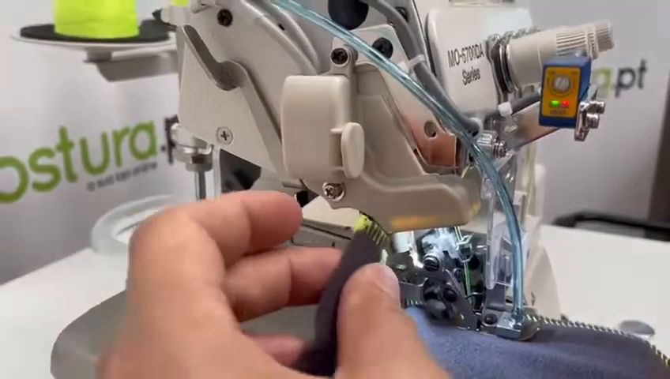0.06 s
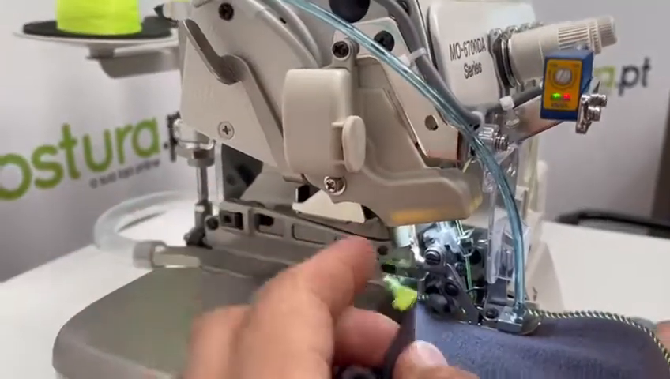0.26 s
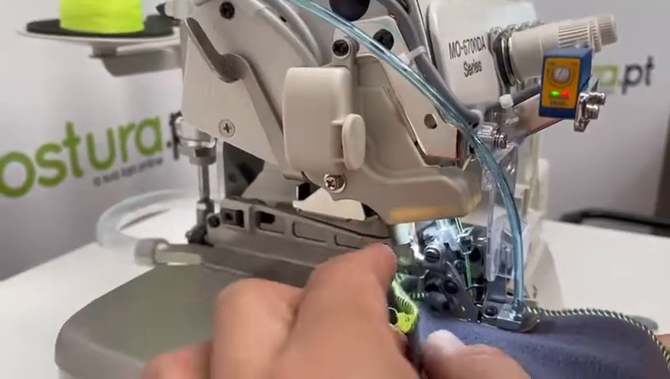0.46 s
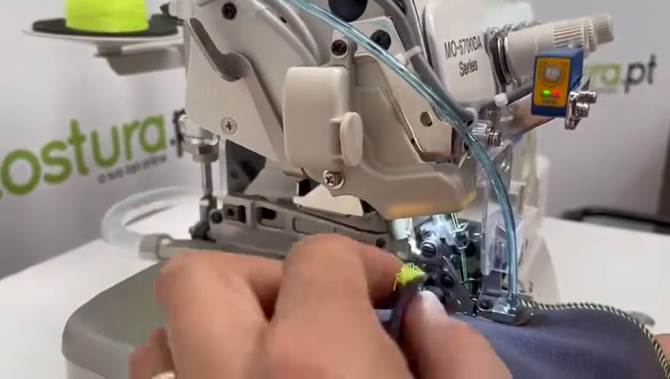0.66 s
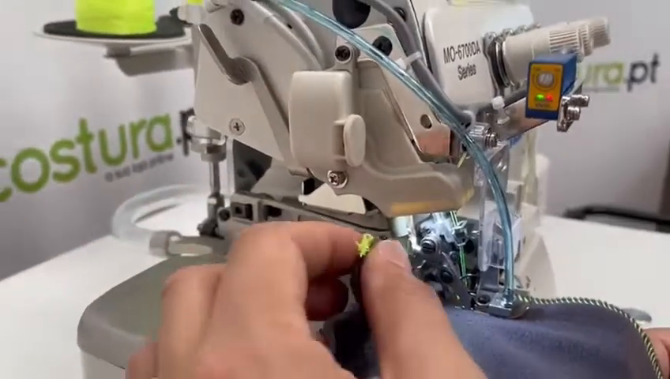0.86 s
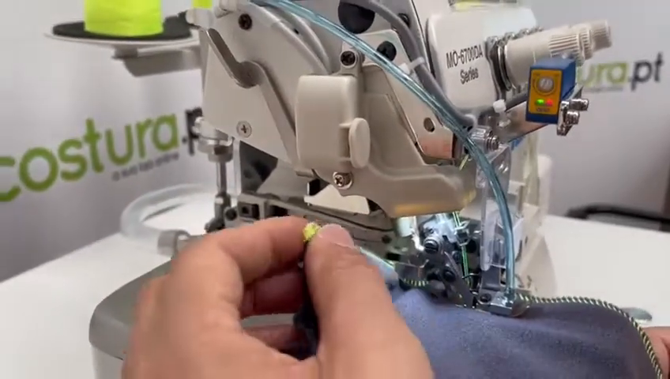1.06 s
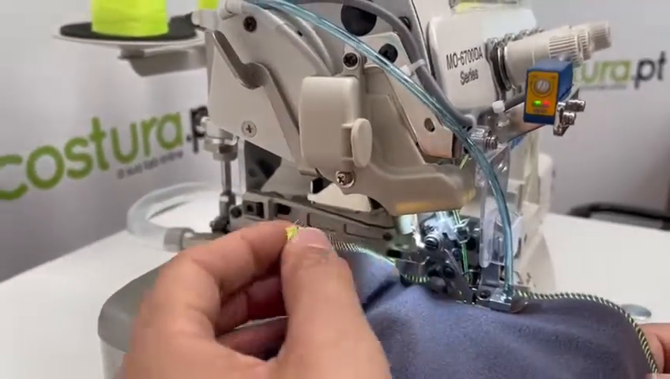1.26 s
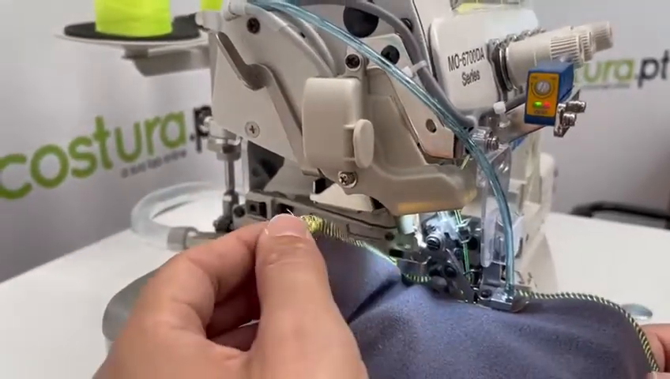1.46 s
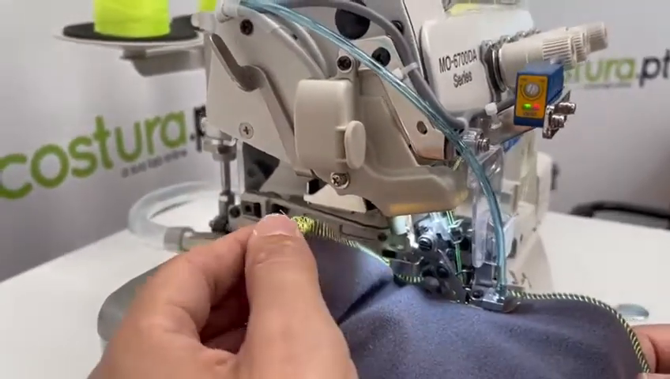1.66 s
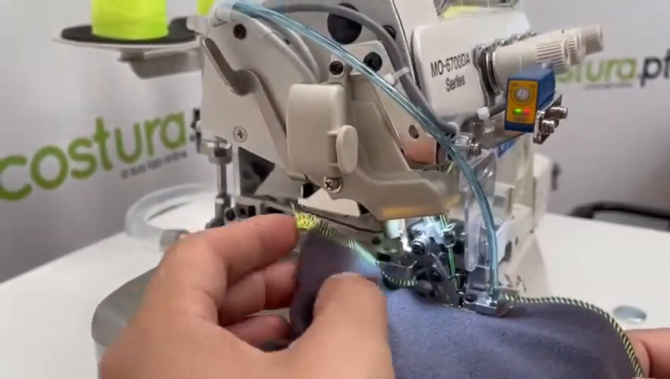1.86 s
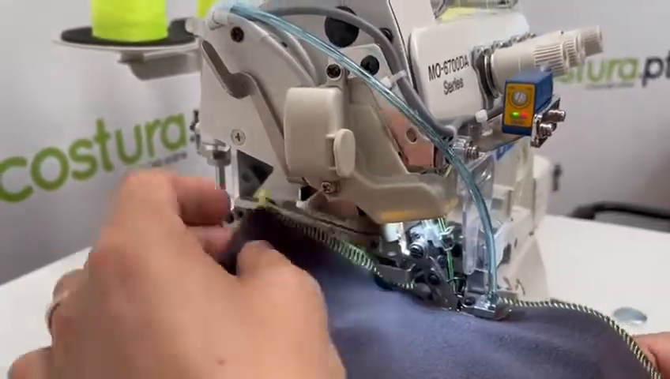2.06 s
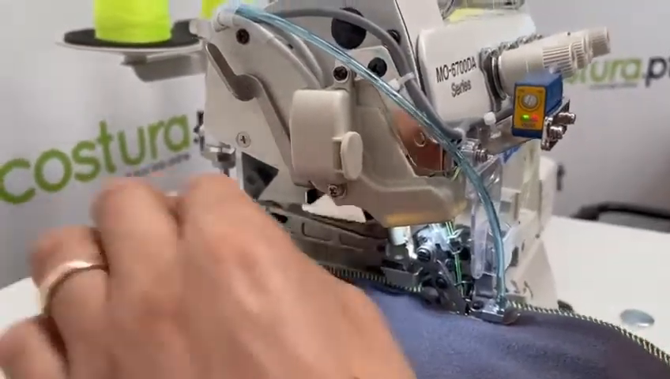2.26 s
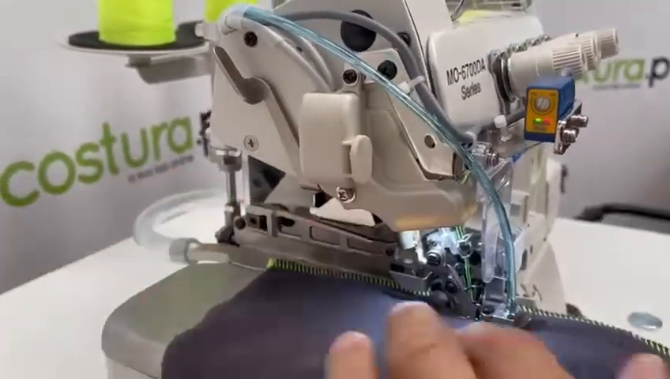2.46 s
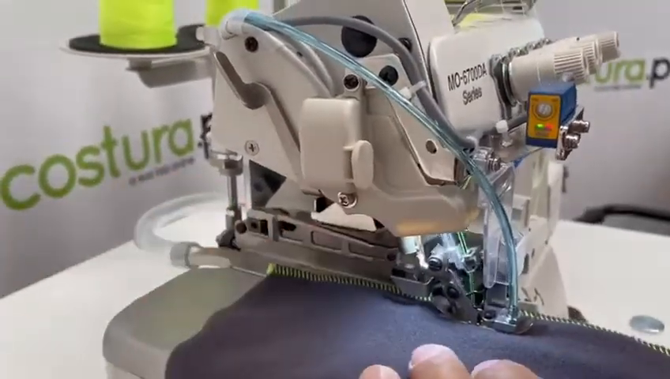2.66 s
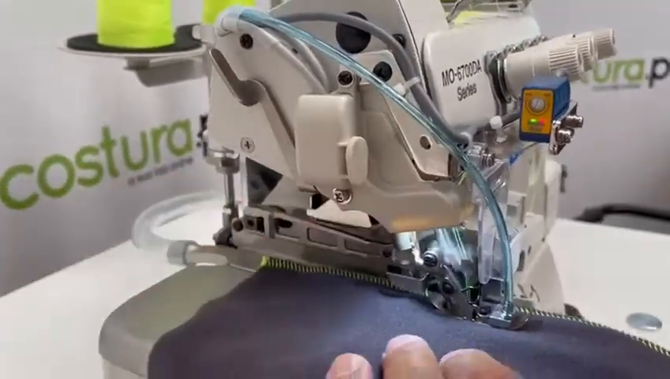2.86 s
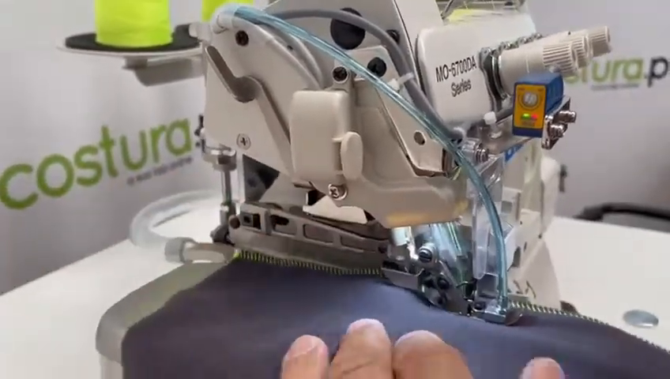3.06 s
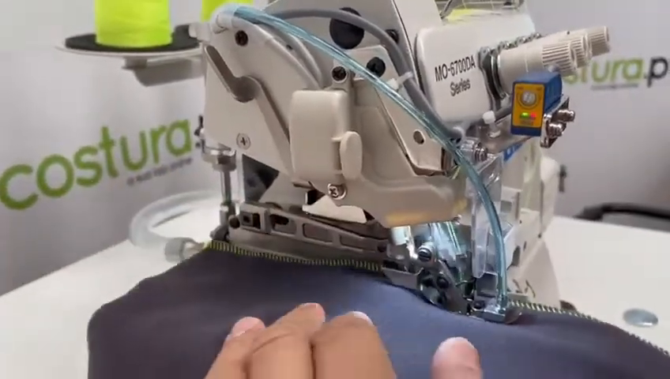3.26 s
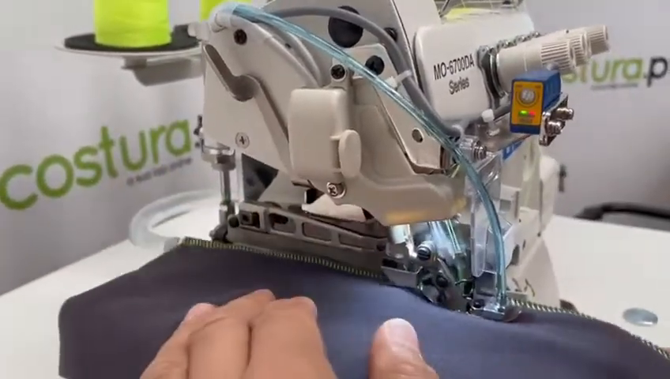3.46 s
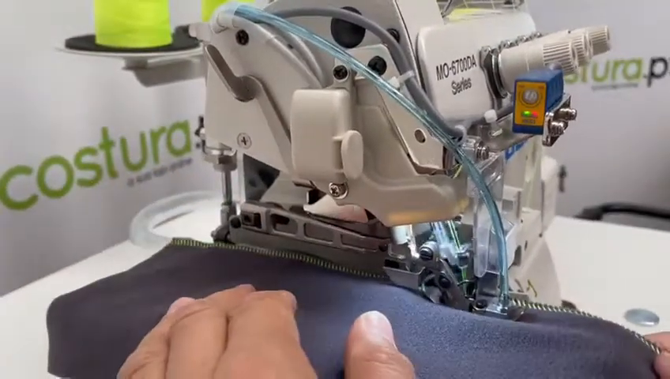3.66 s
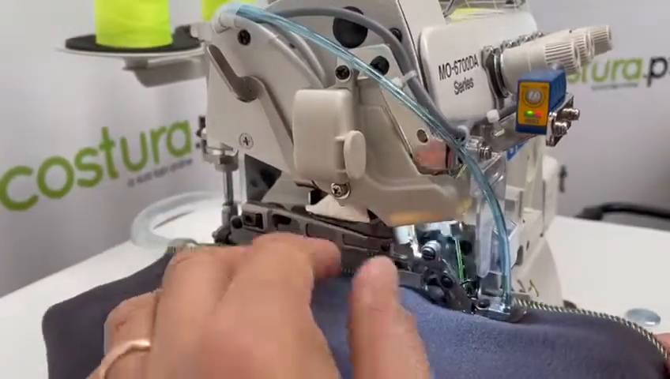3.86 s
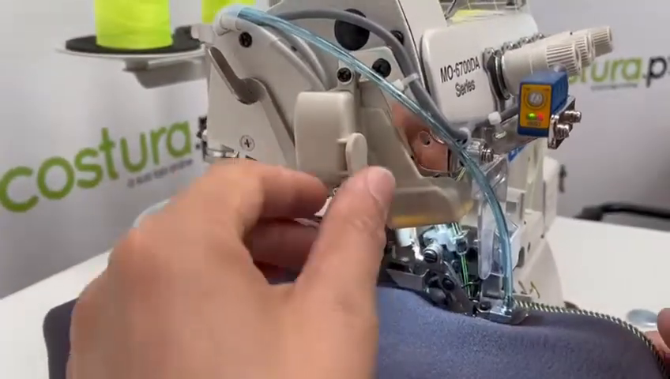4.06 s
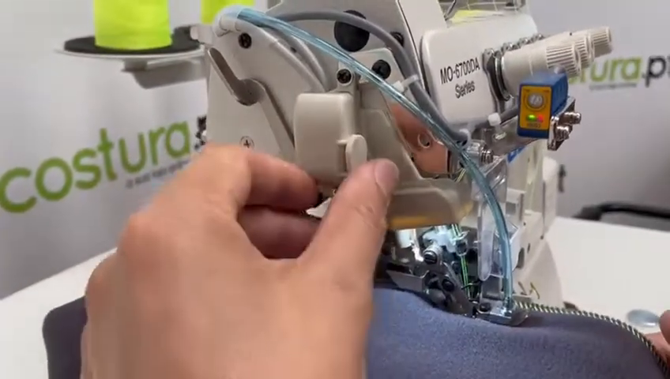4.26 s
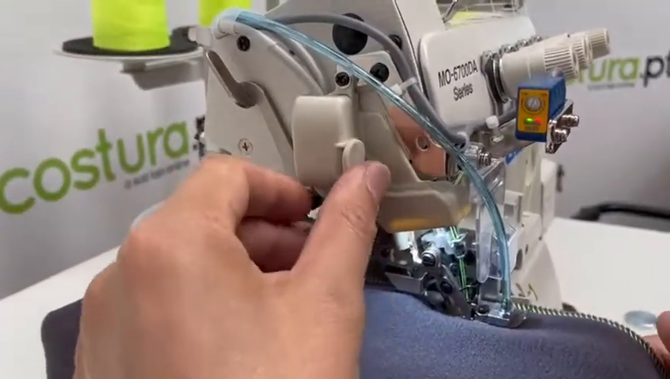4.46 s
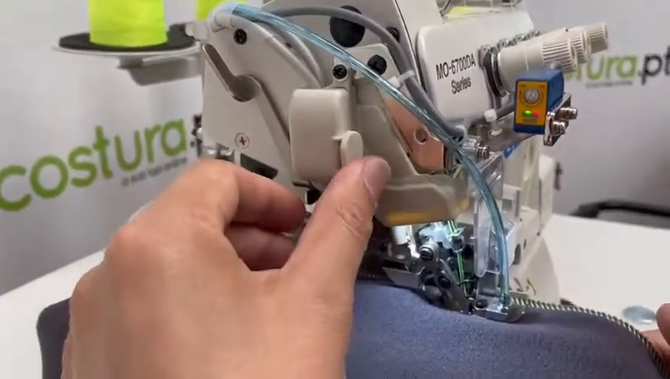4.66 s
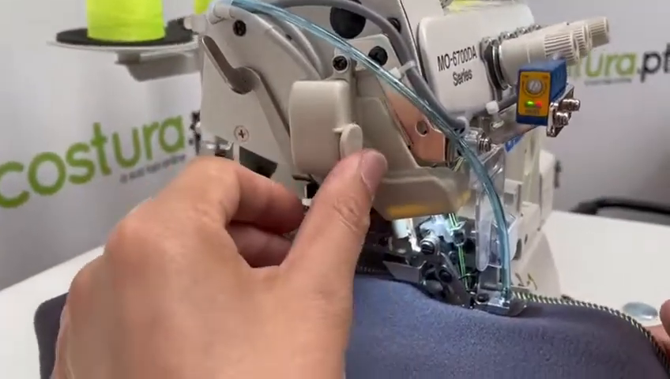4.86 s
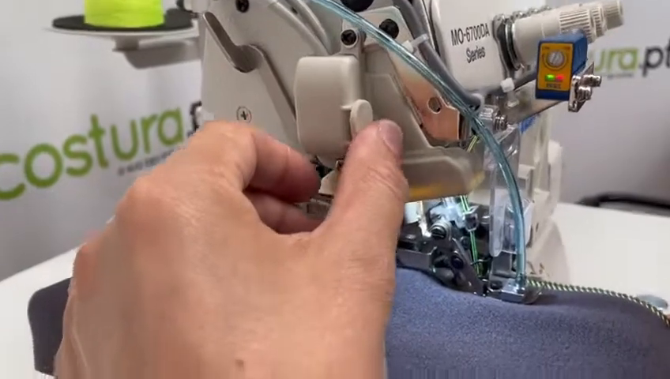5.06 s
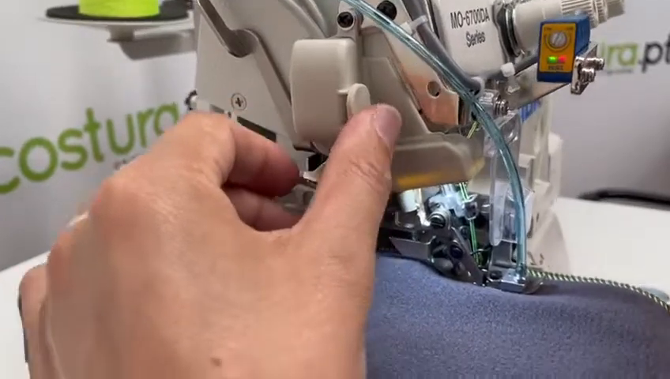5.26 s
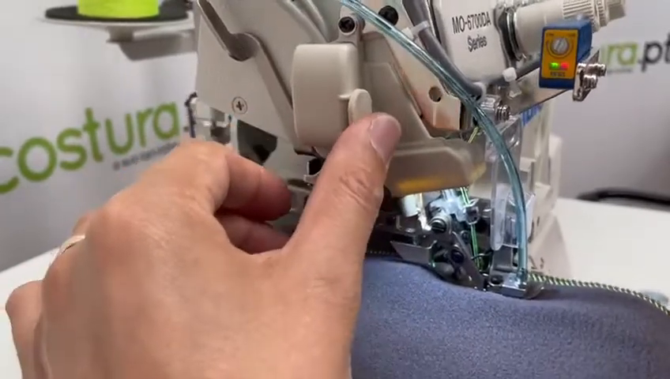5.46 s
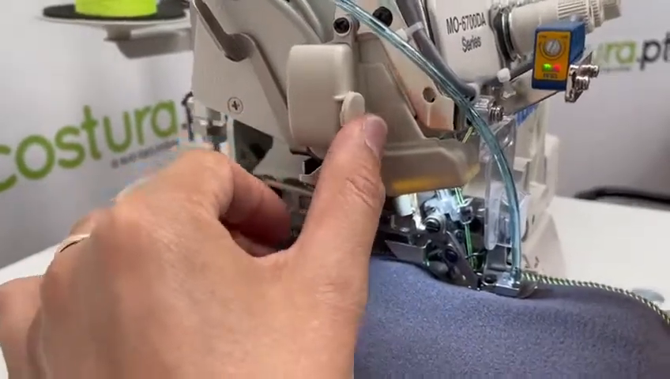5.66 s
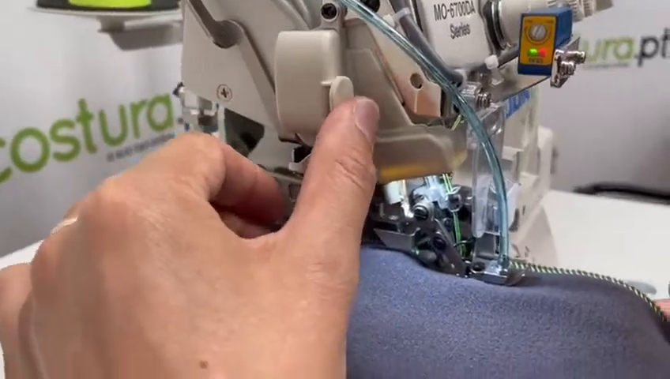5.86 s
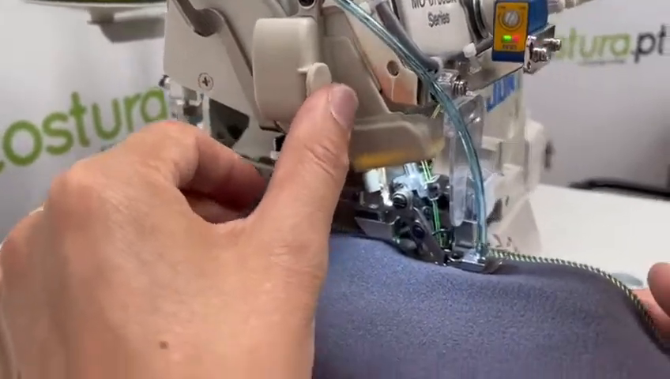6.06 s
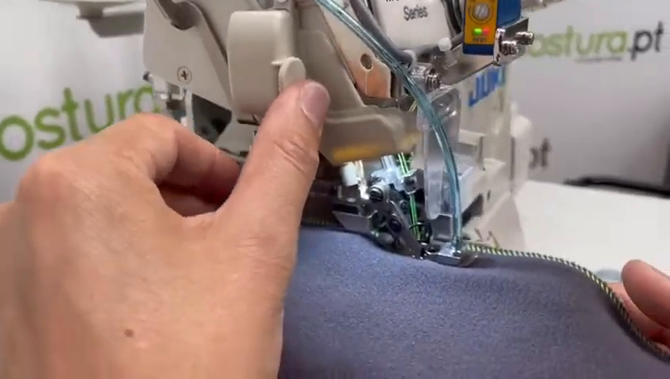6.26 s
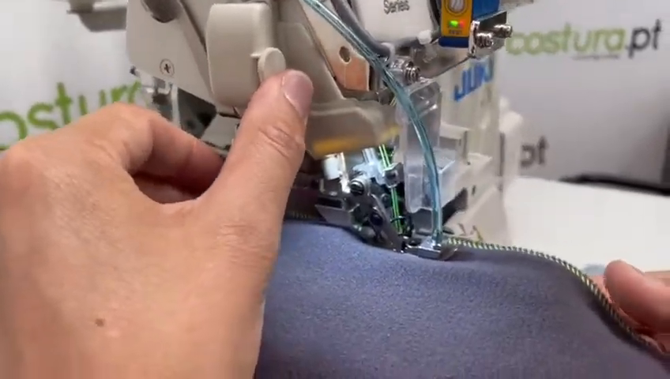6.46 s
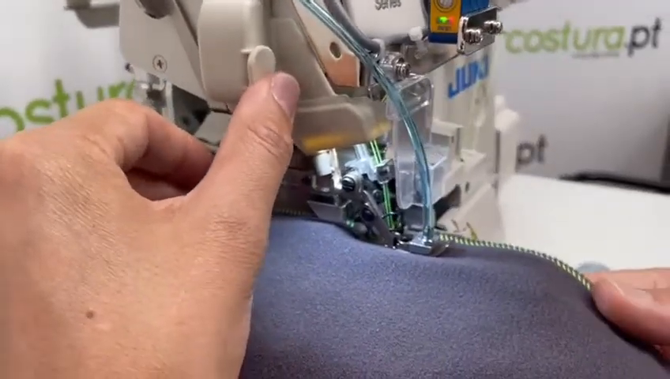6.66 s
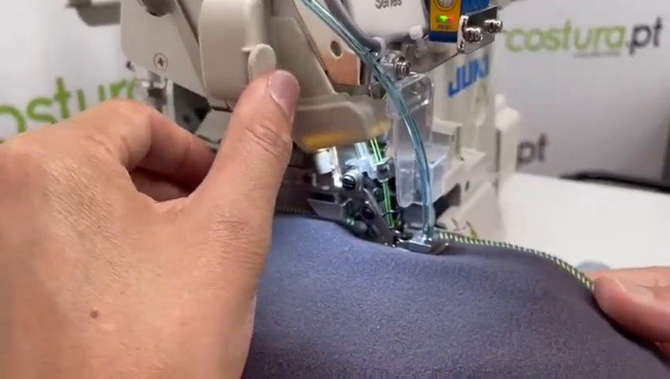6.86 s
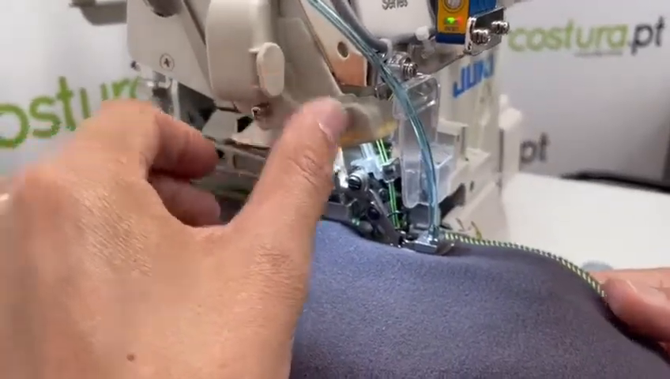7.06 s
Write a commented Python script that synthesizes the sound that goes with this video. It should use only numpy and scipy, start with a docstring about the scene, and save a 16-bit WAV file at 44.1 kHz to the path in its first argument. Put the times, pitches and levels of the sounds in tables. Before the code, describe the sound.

A low, quiet workshop rumble runs throughout. For the first two and a half seconds, hands faintly swish fabric over a work plate, with a soft bump near 2 seconds. At 2.7 seconds, close to the stereo microphone, an air valve snaps open, the presser foot knocks down and a loud, bright suction hiss begins, echoing slightly in the room. From about 2.9 seconds an industrial sewing machine whirrs and rattles through one fast seam, shaking its table. At 3.6 seconds it stops with three rapid, rasping snips and a knock. The air shuts off just after 4 seconds with a spurt and a thump. Then a small steel ratchet gives crisp, dry, slightly scraping clicks in three runs: four from 4.5 to 4.9 seconds, six from 5.7 to 6.4, and four from 6.7 to 7.

```python
"""A low workshop rumble, and hands shifting fabric on the plate of an industrial overlock sewing machine.
Close to the stereo microphone an air valve snaps open, the presser foot drops and suction hisses
through the waste tube. The machine whirrs through one short, fast seam and its knife snips the thread.
The air shuts off with a thump; then a small steel ratchet clicks in three runs, pawl scraping on teeth."""
import sys
import numpy as np
from scipy import signal
from scipy.fft import rfft, irfft, next_fast_len
from scipy.io import wavfile
from scipy.ndimage import uniform_filter1d, map_coordinates

SR = 44100
rng = np.random.default_rng(int(sys.argv[2]) if len(sys.argv) > 2 else 0)


def generate_wav(signal):
    """Clip the signal to [-1, 1] and save it as 16-bit WAV at the path in sys.argv[1]."""
    frames = np.transpose(np.atleast_2d(signal))
    scaled = np.clip(frames, -1, 1) * 32767
    pcm = np.round(scaled).astype(np.int16)
    wavfile.write(sys.argv[1], SR, pcm)


N = 313110

# the workshop's low rumble: freq_hz, density_db
RUMBLE_COLOUR = [(20, -25.5), (36, -16.5), (49, 1.5), (62, -4.5), (100, -12), (150, -23.5), (300, -26.5),
                 (600, -72.5)]
# its dull wash: freq_hz, density_db
WASH_COLOUR = [(60, -12), (140, 2), (270, -2), (450, -8.5), (700, -17.5), (1200, -23.5), (2500, -29.5),
               (5000, -39), (12000, -40.5)]
# its fading mid-range hush: freq_hz, density_db
HUSH_COLOUR = [(150, 0.5), (500, 2.0), (1000, 0.0), (2500, -8.5), (6000, -23)]
# strokes of fabric under the hands: middle_s, half_length_s, swish_db, rub_db
FABRIC_STROKES = [(0.234, 0.11, -78, -84.5), (0.584, 0.046, -80.5, -79.5), (0.72, 0.022, -83.5, -89),
                  (0.802, 0.043, -78.5, -92), (1.09, 0.049, -79, -85), (1.936, 0.085, -87, -85),
                  (2.157, 0.047, -77.5, -77.5), (2.53, 0.11, -85, -85), (2.68, 0.047, -79, -79)]
# fabric swishing: freq_hz, density_db
SWISH_COLOUR = [(1500, -18.5), (4000, -10.5), (6500, -8.5), (8500, 2), (11000, -1), (13000, -24.5)]
# fabric pressed on the plate: freq_hz, density_db
RUB_COLOUR = [(1000, -9.5), (2200, -1), (3000, -6), (4200, -5), (7000, -17)]
# hands bumping the work plate: start_s, thud_db, tick_db
HAND_BUMPS = [(0.377, -79, -73), (1.169, -77, -66.5), (1.3, -74, -70), (1.849, -90, -72.5),
              (1.979, -53.5, -66), (2.06, -66, -86), (2.2, -74, -71)]
# a bump's thud: freq_hz, density_db
THUD_COLOUR = [(100, -8), (250, 9.5), (360, 17), (550, 2.5), (850, -7), (1300, -9.5), (2500, -23),
               (6000, -40)]
# a bump's tick: freq_hz, density_db
TICK_COLOUR = [(400, -21), (850, 11), (1300, -3), (2500, -9.5), (4000, -20), (7000, -40)]
# the air valve opening and shutting: start_s, level_db
VALVE_SNAPS = [(2.6909, -19.5), (4.045, -38.5)]
# metal slapping metal: freq_hz, density_db
SLAP_COLOUR = [(300, -14.5), (1200, -7.5), (4200, -5), (5300, -14.5), (12000, -10.5)]
# resonances of the air cylinder's metal: pitch_hz, width_hz, boost_db
CYLINDER_PEAKS = [(1760, 410, 6), (2790, 230, 9.5), (3930, 500, 8)]
# air in the waste tube: freq_hz, density_db
RUSH_COLOUR = [(60, -7.5), (250, -10), (450, -4.5), (700, 5), (1000, 5.5), (1500, -1.5), (2700, 2),
               (3800, 3.5), (5000, 0), (5700, 1), (7200, 0.5), (8200, 4.5), (9500, -1), (12000, -7.5)]
# the tube's pipe resonances: pitch_hz, width_hz, boost_db
TUBE_PEAKS = [(1370, 52, 1), (1590, 74, -2), (3790, 380, 2.5), (4480, 170, 3.5), (4710, 130, 4.5),
              (5107, 69, 5.5), (6400, 120, 1.5), (7200, 300, -3), (7630, 200, 4), (8280, 180, 4),
              (8960, 160, 2.5)]
# the tube choked or wide open: start_s, end_s, rush_change_db
FLOW_CHANGES = [(2.66, 2.795, -7.5), (3.656, 3.775, -3), (3.78, 3.947, 2)]
# air at the nozzle: freq_hz, density_db
SIZZLE_COLOUR = [(3000, -38.5), (7000, -10), (9000, -0.5), (11000, 8), (13000, -11)]
# blows of the presser foot and its cylinder, the second contact relative to the first:
# start_s, bed_db, boom_db, slap_db, second_contact_s, second_contact_db
FOOT_BLOWS = [(2.699, -23.5, -39, -37, 0.004, 4.5), (3.688, -28.5, -36.5, -45, .02, -6),
              (4.0514, -19.5, -27, -27.5, .079, -13)]
# modes of the foot and its bed: pitch_hz, level_db
BED_MODES = [(155, -21), (225, -2), (295, 3), (350, -3.5), (540, -4.5), (660, -4.5), (800, 0), (930, -11),
             (1070, -11)]
# modes of the table: pitch_hz, level_db, t60_s
TABLE_MODES = [(68, -6, 0.21), (89.5, 4.5, 0.11), (119.6, -1.5, 0.11)]
# the main shaft's speed: time_s, stitches_per_s
SHAFT_SPEED = [(2.97, 42.3), (3.048, 50.5), (3.114, 52.2), (3.194, 52.4), (3.282, 48.4), (3.364, 45.2),
               (3.476, 44.3), (3.578, 42.5)]
# the frame's answer to the stitch strokes: freq_hz, gain_db
FRAME_RESPONSE = [(70, -15), (100, -16), (150, -22), (200, -17), (260, -25.5), (380, -16), (440, -19),
                  (530, -11), (640, -12), (750, 3), (805, -3.5), (895, 5), (945, 1), (990, -11),
                  (1500, -15), (3000, -19)]
# loose parts clattering: freq_hz, density_db
CLATTER_COLOUR = [(500, -20.5), (1000, 4.0), (3000, -4.5), (9000, -13.0)]
# steel guides of needle bar and loopers: pitch_hz, level_db, t60_s
GUIDE_MODES = [(2360, -1.5, 0.034), (3700, 0, 0.027), (4390, -2, .04), (5220, -4.5, .05), (6400, -6, .04),
               (8260, 0.5, .03)]
# the knife's cuts: start_s, level_db
KNIFE_SNIPS = [(3.631, -30), (3.648, -32.5), (3.667, -39)]
# their rasp: freq_hz, density_db
KNIFE_COLOUR = [(600, -16.5), (1100, -13.5), (1500, 1), (2000, -0.5), (2500, -11.5), (5000, -18.5)]
# the ratchet's clicks: start_s, level_db
RATCHET_CLICKS = [(4.522, -20), (4.6745, -18.5), (4.8043, -16.5), (4.934, -19.5), (5.6546, -17),
                  (5.824, -17.5), (5.9633, -18), (6.0864, -18), (6.2123, -16.5), (6.351, -17.5),
                  (6.6996, -20.5), (6.7656, -18.5), (6.8746, -18.5), (7.0205, -17)]
# the pawl scraping a tooth: freq_hz, density_db
SCRAPE_COLOUR = [(1000, -44), (2000, -21.5), (2600, -16.5), (4500, -20), (7000, -19.5), (9500, -7),
                 (11000, -0.5), (13000, -1)]
# the ratchet's steel: pitch_hz, level_db, t60_s
RATCHET_MODES = [(835, -33.5, 0.07), (1805, -9, 0.012), (1974, -15.5, 0.018), (2474, -11, 0.015),
                 (2803, -6.5, 0.013), (4058, -1.5, 0.021), (4966, -4.5, 0.026), (5640, -11, 0.02),
                 (6450, -1.5, 0.011), (6550, -17.5, 0.048), (8153, -5, 0.018), (8770, 3, 0.0055),
                 (9390, -10.5, 0.022)]
# the workshop's reverberation: freq_hz, t60_s
ROOM_DECAY = [(100, 0.34), (400, 1), (2000, 1), (4500, 0.64), (8000, 0.62), (11000, 0.29)]
# stereo width of the sound in each band: freq_hz, side_gain_db
STEREO_WIDTH = [(120, -3.5), (250, -1.5), (500, 3), (1200, 7.5), (2000, 4.5), (3000, 6.5), (5000, -0.5),
                (7300, 6), (8500, -11)]
# the microphone's two ports resonate in the top octave: freq_hz, gain_db
PORT_RESPONSE = [(8500, -0.5), (9500, 5.5), (10800, 4.5), (11400, 3), (11800, -16.5), (12300, -26),
                 (13000, -52)]
# the left port's lag: freq_hz, phase_rad
LEFT_PORT_PHASE = [(8700, 0), (9800, -2.7), (10500, -3.4), (11400, -5.4), (12000, -6.3)]

AIR_ON_S, AIR_OFF_S = 2.691, 4.038
SEW_ON_S, SWING_ON_S, SEW_OFF_S = 2.85, 3, 3.63  # the shaft starts, the table swings, the seam ends
FULL_STITCHES_PER_S = 52
BED_T60_S = 0.054  # the cloth damps all the bed's modes alike
BAND_LIMIT_HZ = 13108


def amp(db):
    """Decibels to gain."""
    return 10 ** (np.asarray(db) / 20)


def unit(x):
    """Scaled to rms 1."""
    return x / np.sqrt(np.mean(x ** 2) + 1e-20)


def along(points, hz):
    """(freq_hz, value) points read on a log axis."""
    freqs, values = np.transpose(points)
    return np.interp(np.log(hz + 1), np.log(freqs + 1), values)


def clock():
    """The time of every sample."""
    return np.arange(N) / SR


def gate(on, off, rise, t60):
    """Opens at on, dies away after off."""
    return np.clip((clock() - on) / rise, 0, 1) * amp(-60 * np.maximum(clock() - off, 0) / t60)


def filtered(x, response):
    """x through a frequency response."""
    size = next_fast_len(N + SR // 2)
    return irfft(rfft(x, size) * response(np.fft.rfftfreq(size, 1 / SR)), size)[..., :N]


def causal(gain_db):
    """The minimum-phase response of a gain curve: a resonance rings only after it is struck."""
    cepstrum = irfft(np.log(amp(gain_db)))
    half = len(cepstrum) // 2
    fold = np.r_[1, np.full(half - 1, 2), 1, np.zeros(half - 1)]
    return np.exp(rfft(cepstrum * fold))


def spread(pair, side_db):
    """Two unrelated signals as the middle and the sides of a stereo pair."""
    side = amp(side_db) * pair[1]
    return np.array([pair[0] + side, pair[0] - side])


def noise(spectrum, side_db, peaks=()):
    """Stereo noise of rms 1 with a broad colour and narrow resonances."""
    def colour(f):
        peaks_db = sum(db / (1 + (2 * (f - hz) / width) ** 2) for hz, width, db in peaks)
        return amp(along(spectrum, f) + peaks_db)
    return unit(spread(filtered(rng.standard_normal((2, N)), colour), side_db))


def flutter(rate, depth_db):
    """A gain that wanders at random, rate times a second."""
    knots = rng.standard_normal(int(N * rate / SR) + 4)
    return amp(depth_db * map_coordinates(knots, [clock() * rate], order=1))


def patchy(x, depth_db):
    """Narrow bands of a sound rise and fall at random for a few hundredths of a second."""
    bands = signal.stft(x, nperseg=512)[2]
    field = uniform_filter1d(rng.standard_normal(bands.shape[-2:]), size=3, axis=0)
    field = uniform_filter1d(field, size=8, axis=1)
    return signal.istft(bands * amp(depth_db * unit(field)), nperseg=512)[1][..., :N]


def add(track, start_s, sound):
    """Mixes a sound into a track."""
    part = track[..., round(start_s * SR):][..., :sound.shape[-1]]
    part += sound[..., :part.shape[-1]]


def strikes(times, levels_db, attack, t60):
    """An envelope that jumps at each time and dies away."""
    age = clock()[:SR]
    envelope = np.zeros(N)
    for start_s, db in zip(times, levels_db):
        add(envelope, start_s, amp(db - 60 * age / t60) * (1 - np.exp(-age / attack)))
    return envelope


def ring(modes, attack, scatter_db, size=SR // 4):
    """One blow on a set of modes, each at a new strength."""
    t = np.arange(size) / SR
    tones = np.zeros(size)
    for hz, db, t60 in modes:
        decay = amp(db + scatter_db * rng.normal() - 60 * t / t60)
        tones += decay * np.sin(2 * np.pi * (hz * t + rng.random()))
    return tones * (1 - np.exp(-t / attack))


def workshop():
    """Room tone: a slowly growing rumble, a hush that fades at once, a dull wash that swells at the end."""
    t = clock()
    rumble = amp(-62 + 0.83 * t) * noise(RUMBLE_COLOUR, side_db=-27)
    hush = amp(-66.5 - 60 * t) * noise(HUSH_COLOUR, side_db=-6.5)
    wash = amp(-70.5 + 5.5 * np.maximum(t - 5.96, 0)) * noise(WASH_COLOUR, side_db=-8.5)
    return rumble + hush + wash


def hands():
    """Fabric swishes and rubs over the plate in small catches and the hands bump it softly."""
    middles, halves, swish_db, rub_db = np.transpose(FABRIC_STROKES)
    strokes = np.exp(-((clock() - middles[:, None]) / halves[:, None]) ** 2)
    sliding = strokes * flutter(rate=140, depth_db=2.5)
    swish = amp(swish_db) @ sliding * patchy(noise(SWISH_COLOUR, side_db=-9.5), depth_db=3.5)
    rub = amp(rub_db) @ sliding * patchy(noise(RUB_COLOUR, side_db=-7), depth_db=3.5)
    times, thud_db, tick_db = np.transpose(HAND_BUMPS)
    thuds = noise(THUD_COLOUR, side_db=-6.5) * strikes(times, thud_db, attack=0.002, t60=0.68)
    ticks = noise(TICK_COLOUR, side_db=-13) * strikes(times, tick_db, attack=0.00041, t60=0.2)
    return swish + rub + thuds + ticks


def valve():
    """A dry metal snap as the air is switched."""
    snaps = strikes(*np.transpose(VALVE_SNAPS), attack=0.00049, t60=0.017)
    return snaps * noise(SLAP_COLOUR, side_db=-7.5, peaks=CYLINDER_PEAKS)


def suction(edge_s=0.0036, eddy_db=2.2):
    """Compressed air rushes through the waste tube; when that flow is choked, the nozzle sizzles more."""
    t = clock()
    flow_db = sum(db * (np.tanh((t - start) / edge_s) - np.tanh((t - end) / edge_s)) / 2
                  for start, end, db in FLOW_CHANGES)
    rush_db = -35 + 1.5 * (t - AIR_ON_S) + flow_db
    rush = amp(rush_db) * patchy(noise(RUSH_COLOUR, side_db=-24, peaks=TUBE_PEAKS), eddy_db)
    pressure = np.clip((t - AIR_ON_S) / 0.054, 0, 1)  # builds up behind the nozzle
    sizzle_db = -34.5 - 2.5 * np.tanh(flow_db / 2)
    sizzle = amp(sizzle_db) * pressure * patchy(noise(SIZZLE_COLOUR, side_db=-17.5), eddy_db)
    sizzle *= flutter(rate=79, depth_db=2.5)
    rush *= flutter(rate=120, depth_db=1.1)
    spurt = amp(9.5 * np.exp(-((t - AIR_OFF_S - 0.012) / 0.0089) ** 2))  # as the valve shuts
    return gate(AIR_ON_S, AIR_OFF_S, rise=0.004, t60=0.11) * spurt * (rush + sizzle)


def presser_foot(second_boom_db=-6):
    """Each blow slaps metal and makes two contacts that ring the bed and boom in the table."""
    body = np.zeros((2, N))
    bed = [(hz, db, BED_T60_S) for hz, db in BED_MODES]
    for start_s, bed_db, boom_db, _, second_contact_s, second_contact_db in FOOT_BLOWS:
        first = (start_s, bed_db, boom_db)
        second = (start_s + second_contact_s, bed_db + second_contact_db, boom_db + second_boom_db)
        for hit_s, ring_db, table_db in (first, second):  # tap then thump, or thump then softer knock
            add(body[0], hit_s, amp(table_db) * ring(TABLE_MODES, attack=0.0049, scatter_db=2.5))
            for part in body:
                add(part, hit_s, amp(ring_db - 4) * ring(bed, attack=0.00041, scatter_db=1.5))
    times, _, _, slap_db, _, _ = np.transpose(FOOT_BLOWS)
    metal = noise(SLAP_COLOUR, side_db=-7.5, peaks=CYLINDER_PEAKS)
    slaps = metal * strikes(times, slap_db + 4.5, attack=0.00055, t60=0.027)
    return spread(body, side_db=-13) + slaps


def machine():
    """Once a stitch the shaft shakes the table, rings the frame and rattles parts. Faster is louder."""
    speed = np.interp(clock(), *np.transpose(SHAFT_SPEED))
    pace = speed / FULL_STITCHES_PER_S
    turns = np.cumsum(speed) / SR
    swing = gate(SWING_ON_S, SEW_OFF_S, rise=0.16, t60=0.053)
    shake = amp(-32) * pace ** 5.5 * swing * np.sin(2 * np.pi * turns)
    soft_start = amp(-8 * np.clip(1 - (clock() - SWING_ON_S) / 0.017, 0, 1))  # until it takes up speed
    force = amp(-32.5) * pace ** 0.4 * soft_start * gate(SEW_ON_S, SEW_OFF_S, rise=0.11, t60=0.13)
    whirr = shaft_whirr(speed, turns)
    beat = 1 + np.cos(2 * np.pi * turns)
    rattle = unit(noise(FRAME_RESPONSE, side_db=-17) * beat)
    clatter = unit(noise(CLATTER_COLOUR, side_db=-6) * beat)
    frame = amp(-1.5) * whirr + amp(-17.5) * rattle + amp(-16.5) * clatter
    return shake + force * frame + linkages(turns)


def shaft_whirr(speed, turns):
    """Strokes repeating each turn give multiples of the speed, gliding through the frame's resonances."""
    orders = np.arange(2, 48)[:, None]
    running = (clock() > SEW_ON_S) & (clock() < SEW_OFF_S + 0.15)
    offsets = 0.62 * rng.random(orders.shape)  # several parts strike each turn, only loosely in step
    gains = amp(along(FRAME_RESPONSE, orders * speed[running]))
    tones = gains * np.sin(2 * np.pi * (orders * turns[running] + offsets))
    whirr = np.zeros(N)
    whirr[running] = unit(tones.sum(0))
    return patchy(whirr, depth_db=1.6)


def linkages(turns, needle_db=-40.5, looper_db=-44):
    """The needle bar and, half a turn later, the loopers tick against their steel guides."""
    ticks = np.zeros((2, N))
    half_turns_s = np.flatnonzero(np.diff(np.floor(2 * turns))) / SR
    sewing = (half_turns_s > SEW_ON_S) & (half_turns_s < SEW_OFF_S)
    for k, start_s in enumerate(half_turns_s[sewing]):
        gain = amp(looper_db if k % 2 else needle_db)
        for part in ticks:
            add(part, start_s, gain * ring(GUIDE_MODES, attack=0.0003, scatter_db=4.5, size=SR // 16))
    return spread(ticks, side_db=-14)


def knife():
    """Three quick rasping cuts snip the thread chain as the seam ends."""
    cuts = strikes(*np.transpose(KNIFE_SNIPS), attack=0.000958, t60=0.094)
    return cuts * noise(KNIFE_COLOUR, side_db=-14)


def ratchet():
    """The pawl scrapes over a tooth for a millisecond or two, then its steel rings briefly."""
    clicks = np.zeros((2, N))
    t = np.arange(SR // 4) / SR
    tail = amp(-8.5 - 60 * t / 0.025) * (1 - np.exp(-t / 0.001))
    stroke = np.exp(-((t - 0.0014) / 0.00068) ** 2) + tail
    grit = noise(SCRAPE_COLOUR, side_db=-7)
    for k, (start_s, level_db) in enumerate(RATCHET_CLICKS):
        tooth = stroke * grit[:, k * len(t):(k + 1) * len(t)]
        scrape = amp(level_db + 2.5) * unit(tooth) * stroke.std()
        rings = [ring(RATCHET_MODES, attack=0.0012, scatter_db=1) for _ in range(2)]
        steel_db = -36 + 3.5 * (start_s - RATCHET_CLICKS[0][0])  # louder as the ratchet is wound on
        steel = amp(steel_db) * spread(rings, side_db=-9)
        add(clicks, start_s, scrape)
        add(clicks, start_s + 0.0006, steel)
        add(clicks, start_s, room(amp(-17.5) * scrape + amp(-21) * steel, side_db=-8))
    return clicks


def room(x, side_db):
    """The workshop's reverberation; each frequency dies at its own speed."""
    hz, t, bands = signal.stft(rng.standard_normal((2, SR)), SR, nperseg=256)
    decay = amp(-60 * t / along(ROOM_DECAY, hz)[:, None])
    tail = signal.istft(bands * decay, SR, nperseg=256)[1]
    tail *= 1 - np.exp(-np.arange(tail.shape[1]) / SR / 0.0082)  # echoes take a moment to build up
    response = spread(tail / np.linalg.norm(tail[0]), side_db)
    return signal.fftconvolve(x.mean(0)[None], response, axes=1)[:, :N]


def scene():
    """Beside the machine: the air fills the room; the works, foot and ratchet sound closer and drier."""
    air = suction()
    works = machine() + valve() + knife()
    foot = presser_foot()
    reverb = room(amp(-11.5) * air + amp(-15) * works + amp(-13) * foot, side_db=-9)
    return air + works + foot + reverb + ratchet() + hands() + workshop()


def record(dry):
    """Stereo width by band, two microphone ports out of step near their resonance, and a band limit."""
    def ports(hz):
        left_lag = np.exp(1j * along(LEFT_PORT_PHASE, hz) * np.array([[1], [0]]))
        return causal(along(PORT_RESPONSE, hz)) * left_lag
    mid = dry.mean(0)
    side = filtered((dry[0] - dry[1]) / 2, lambda hz: amp(along(STEREO_WIDTH, hz)))
    return filtered(np.array([mid + side, mid - side]), lambda hz: ports(hz) * (hz < BAND_LIMIT_HZ))


dry = scene()
out = record(dry)
generate_wav(out)
```